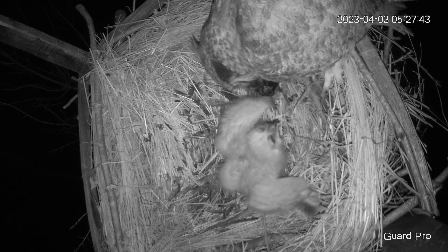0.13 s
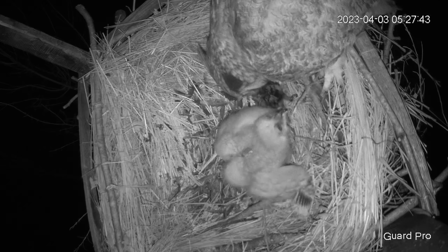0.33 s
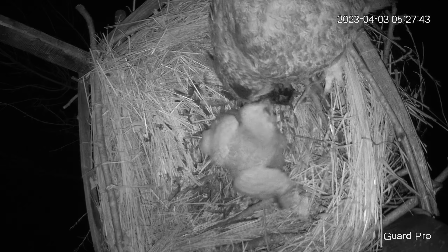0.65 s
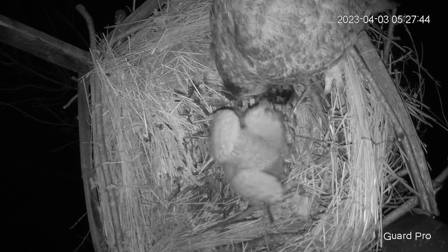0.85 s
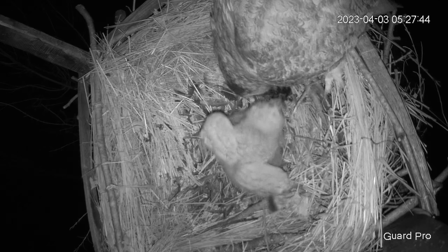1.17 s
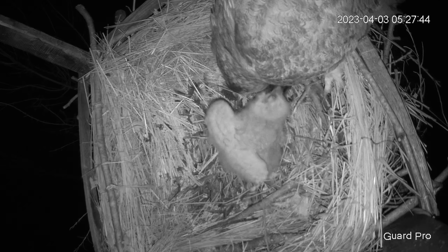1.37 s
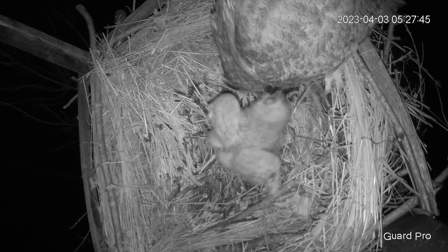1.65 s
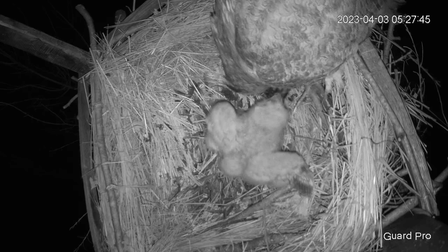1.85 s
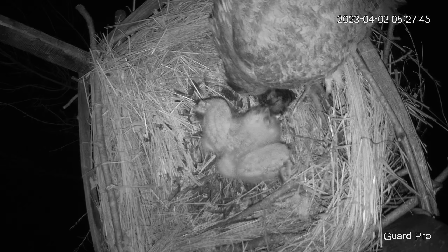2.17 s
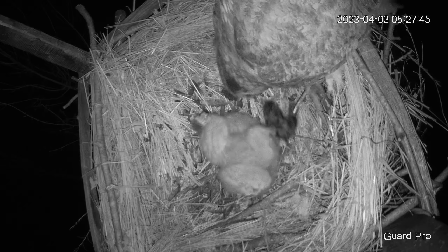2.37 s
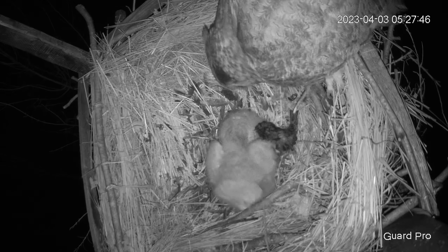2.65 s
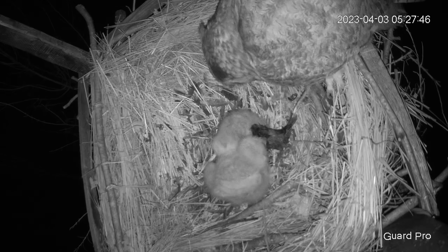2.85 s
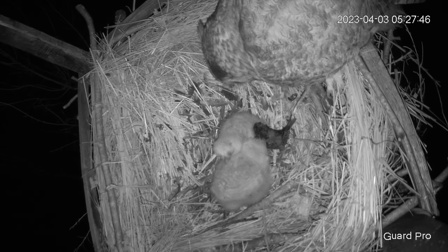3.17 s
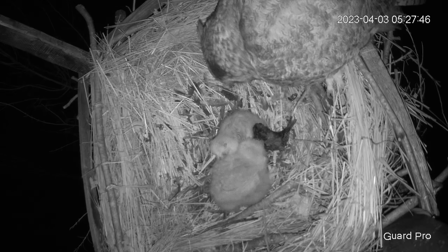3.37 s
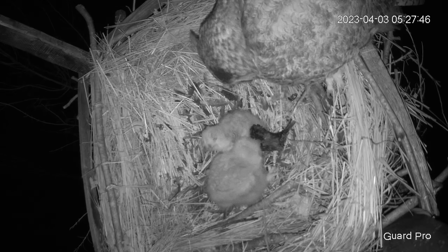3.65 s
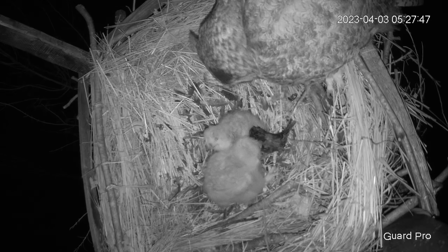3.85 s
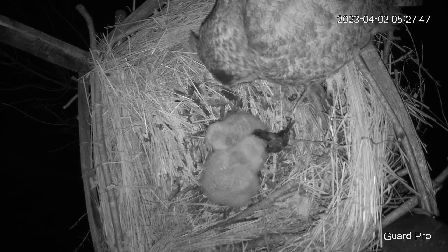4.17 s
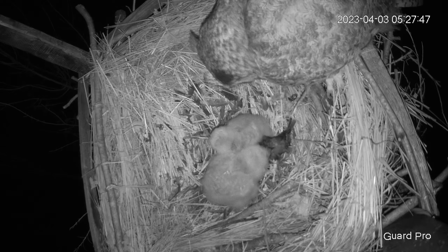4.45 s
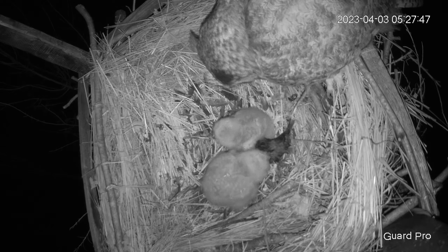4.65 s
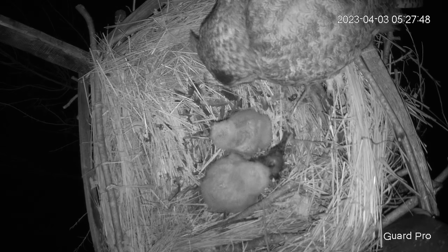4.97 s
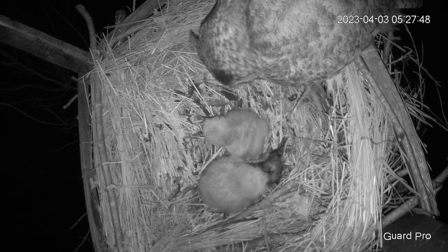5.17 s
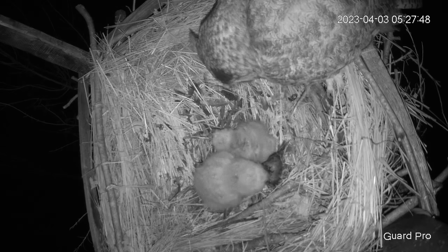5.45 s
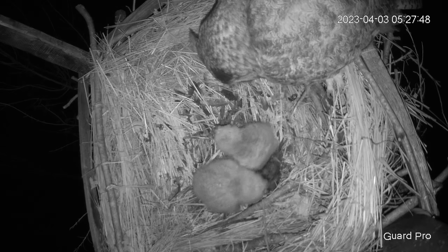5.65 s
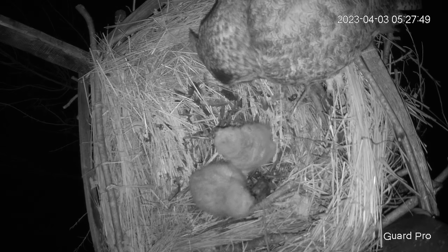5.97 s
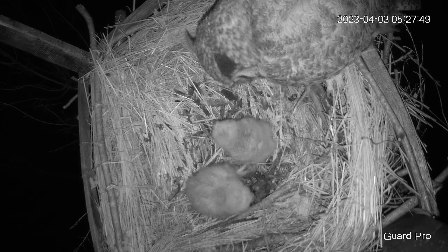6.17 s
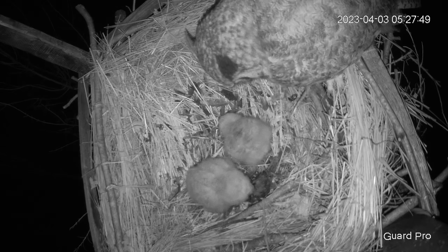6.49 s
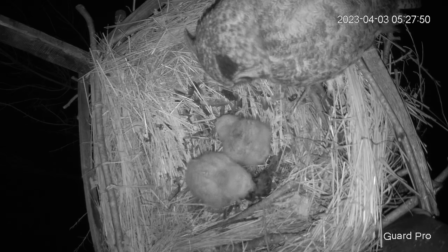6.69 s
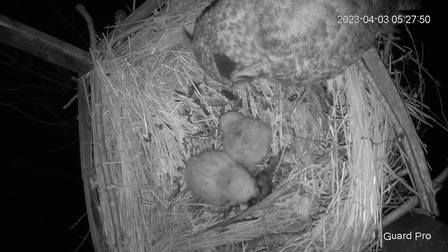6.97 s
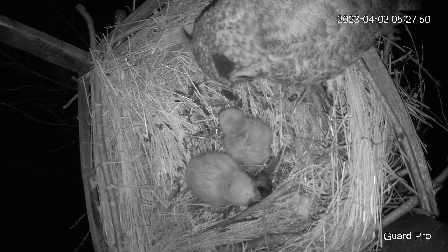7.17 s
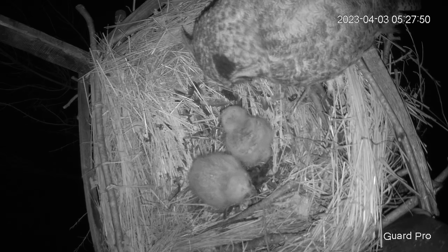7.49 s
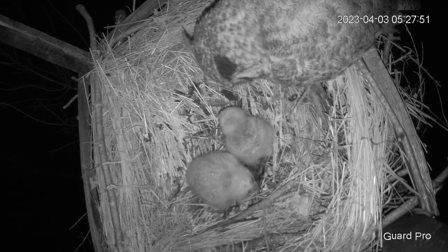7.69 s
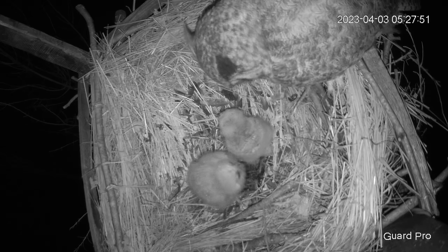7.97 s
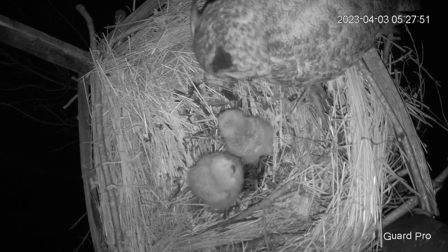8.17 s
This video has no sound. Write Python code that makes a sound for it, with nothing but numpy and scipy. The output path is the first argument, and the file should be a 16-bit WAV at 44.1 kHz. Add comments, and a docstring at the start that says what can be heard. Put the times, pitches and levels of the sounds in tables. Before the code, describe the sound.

Young owls give three raspy, whistling begging screeches in a straw-lined nest box, between dry straw crackles, dull low bumps and near silence.

```python
"""Owlets beg in a straw-lined wooden nest box at night, heard close up.
Three screeches, the middle one weaker, scoop up as a whistle, break into a two-voiced rasp and slide down;
low hoarse undertones are resonant noise around a wavering tone, and a fluttering hiss leads into the last.
Coloured noise and crackles make the straw, low sine swings the bumps, ringing noise the scrapes on the wood.
Behind them lies a dull noise wash with a faint hum and hollow tones from narrow resonances."""
import sys
import numpy as np
from scipy import signal
from scipy.fft import rfft, irfft, next_fast_len
from scipy.io import wavfile
from scipy.ndimage import uniform_filter1d

SR = 44100
rng = np.random.default_rng(int(sys.argv[2]) if len(sys.argv) > 2 else 0)


def transcribe(signal):
    """Save signal, clipped to [-1, 1], as a 16-bit WAV file at the path in sys.argv[1]."""
    frames = np.atleast_2d(signal).T
    limited = np.clip(frames, -1, 1)
    pcm = np.round(limited * 32767).astype(np.int16)
    wavfile.write(sys.argv[1], SR, pcm)


N = 367348
TIME = np.arange(N) / SR

# Spectrum of the steady background wash: frequency_hz, relative_density_db
NIGHT_SPECTRUM = [(20, -4), (35, -3.5), (80, -12), (160, -19), (300, -26.5), (600, -28), (800, -33.5),
                  (1300, -45), (1700, -49), (3000, -46.5), (4200, -53), (7200, -52.5)]
# Resonances of the air in the box: frequency_hz, width_hz, relative_level_db
BOX_AIR = [(254, 77.5, -6), (344.9, 78, -6), (571, 150, -2)]
# Faint hollow tones in the background: middle_s, level_db, length_s, pitch_hz
HOLLOW_TONES = [(0.424, -58.5, 0.25, 570), (0.571, -64, 0.13, 560), (1.061, -59, 0.13, 604),
                (2.062, -66, 0.17, 330), (2.76, -67.5, .12, 556.7), (3.328, -66, 0.21, 559),
                (5.72, -68.5, 0.21, 478.3), (7.801, -64, .35, 470)]
# Low rumbles: a short low burst right at the start, then weight shifts on the floor: middle_s, level_db (before
# the trim), length_s
WEIGHT_SHIFTS = [(.005, -33, 0.086), (0.282, -44.5, 0.24), (0.452, -47, 0.69), (1.19, -52, .2),
                 (1.34, -53, .16), (1.6, -51.5, .14), (1.83, -50.5, 0.27), (2.221, -42, 0.17),
                 (2.526, -42, .26), (3.46, -50, 0.32), (4.781, -40.5, 0.24), (5.14, -43, 0.19),
                 (5.62, -44, 0.18), (5.83, -39, .14), (5.91, -41.5, 0.2), (6.03, -39.5, 0.12),
                 (6.251, -46.5, .16), (6.37, -42, 0.14), (6.5, -44.5, .28), (6.72, -39.5, 0.3),
                 (7.22, -51, .15), (7.702, -43, 0.36), (7.831, -53, 0.13)]
# Spectrum of the floor rumble: frequency_hz, relative_density_db
FLOORBOARD = [(12, 0), (25, 7), (40, -4.5), (80, -10), (125, -15.5), (200, -28), (400, -41), (900, -66)]
# Bumps against the box: start_s, peak_db (before the trim), pitch_hz, decay_s (to -60 dB)
BUMPS = [(0.314, -26, 38.4, 0.33), (0.346, -28, 53, 0.1), (2.294, -26.5, 16, 0.38),
         (2.384, -22.5, 29.5, 0.19), (2.425, -23, 76, 0.062), (2.754, -41.5, 34.2, 0.51),
         (3.163, -37, 42.6, 0.19), (4.627, -23, 42.2, 0.149), (4.934, -31, 25.2, 0.27),
         (6.4, -21.5, 34, 0.088), (6.608, -18.5, 28.7, 0.12), (6.661, -24, 38, 0.044),
         (6.772, -30.5, 49, 0.064), (6.836, -33.5, 65.3, 0.11)]
# Feet scuffing the wood: start_s, level_db (before the fades and the wood)
SCUFFS = [(0.335, -53), (0.554, -48.5), (1.635, -60.5), (2.311, -39.5), (2.418, -57), (2.6, -53.5),
          (4.325, -64), (4.63, -57), (6.397, -60), (6.61, -57.5), (8.26, -56)]
# Resonances of the scuffed wood: frequency_hz, width_hz, relative_level_db
WOOD = [(149, 210, -1), (286.4, 88.4, 8), (434, 100, -3.5), (600, 1600, -11)]
# Shuffles in the straw: middle_s, level_db (before the trim), length_s
SHUFFLES = [(0.068, -65.5, 0.16), (0.233, -57, 0.11), (0.291, -52.5, 0.11), (0.415, -59, 0.11),
            (0.602, -74, 0.28), (0.731, -60, 0.052), (0.854, -74.5, 0.15), (.915, -67.5, 0.067),
            (1.77, -65, .38), (2.039, -62.5, .14), (2.104, -70, .1), (2.21, -60, 0.11), (2.3, -58.5, 0.059),
            (2.367, -74.5, 0.081), (2.486, -55, .17), (2.565, -65.5, 0.075), (2.682, -52.5, 0.075),
            (2.718, -55.5, 0.053), (2.86, -78, 0.17), (3.045, -73, .1), (3.145, -71.5, .15),
            (4.156, -56, 0.12), (4.981, -77, 0.49), (5.289, -67.5, 0.085), (5.364, -76, 0.075),
            (5.478, -71, 0.088), (5.578, -62.5, 0.18), (5.76, -73, 0.35), (5.928, -65.5, 0.14),
            (6.204, -72, .08), (6.304, -66, 0.13), (6.57, -82.5, 0.28), (7.347, -78.5, .12)]
# Stalks that snap: start_s, level_db (before the trim and the straw colour)
SNAPS = [(0.041, -46), (0.279, -38.5), (0.31, -38.5), (0.386, -42.5), (0.546, -40), (0.713, -44.5),
         (.903, -47.5), (1.748, -49), (2.073, -42.5), (2.104, -40.5), (2.188, -39), (2.452, -36),
         (2.669, -37), (2.72, -38.5), (3.114, -44.5), (4.163, -40.5), (4.644, -51), (5.198, -48.5),
         (5.539, -43), (5.584, -42), (6.193, -51), (6.797, -50.5)]
# Spectrum of the straw: frequency_hz, relative_density_db
STRAW_SPECTRUM = [(530, -45), (900, -10.5), (1090, -16.5), (1220, -11.5), (1530, -22), (1890, -5.5),
                  (2510, -8.5), (2670, -3.5), (2910, 3), (3680, -6), (4310, -21.5), (4950, -18),
                  (5550, -11.5), (6320, -19.5), (7000, -10), (9360, -32.5), (15800, -120)]
# The fainter hissing call: start_s, length_s, level_db (before the fades)
HISS_CALL = (7.606, .27, -36.5)
# Throat of the hiss: frequency_hz, width_hz, open_beak_db, shut_beak_loss_db
HISS_THROAT = [(1309, 400, -10.5, 18), (1740, 340, -17.5, 19.5), (2663, 660, -1, 14), (3050, 570, 2.5, 10),
               (3690, 280, 1, 1.5), (4060, 280, -8, 5), (4750, 410, -23, 6), (5370, 490, -32.5, 17.5)]
# Low second voice under each screech:
# start_s, length_s, level_db (at mid-length, before the partials' gains), growth_db_per_s, pitch_hz, glide_hz_per_s
UNDERTONES = [(1.301, .36, -42.5, 10, 1232, 170.5), (4.241, .315, -39, 19.5, 1043, -110),
              (7.743, .29, -42, -8.5, 1051, 125.5)]
# Hoarse partials of that voice: pitch_multiple, width_hz, relative_level_db
UNDERTONE_PARTIALS = [(1, 179, -1.5), (1.19, 520, -10.5), (1.55, 295, -14.5), (2, 602.5, -2.5),
                      (2.449, 501.5, -2)]
# Screeches: start_s, full_voice_s, climax_s, end_s, effort_db, weaker_at_first_db, weaker_before_climax_db,
# weaker_in_slide_db, pitch_hz, roughness_before_climax (0-1)
SCREECHES = [(1.290, 1.412, 1.579, 1.654, -15, 2.6, 0, 18, 3278, .44),
             (4.225, 4.401, 4.534, 4.572, -25.5, 7.5, -1, 7, 3171, .76),
             (7.723, 7.852, 7.982, 8.027, -14.5, 10, 1.5, 10.5, 3108, .4)]
# Throat and open beak that shape the whistle: frequency_hz, gain_db
THROAT = [(1300, -41), (1900, -8), (2150, -7), (2480, -5), (2750, 0.5), (3750, -1.5), (4050, -20.5),
          (4350, -24.5), (7000, -28.5)]
# Air ringing the throat above the whistle:
# throat_multiple, width_hz, level_db (at a flow of -10 dB), extra_db_per_db of flow
THROAT_AIR = [(1.23, 420, -22, -0.5), (1.488, 486, -33, -0.08), (1.69, 351, -32, 0.65),
              (1.89, 413, -34.5, 1), (2.1, 519.6, -45.5, 1)]
# Colour that the box gives to the calls: frequency_hz, gain_db
BOX_COLOUR = [(700, -3.5), (1000, 0), (1280, 0), (1520, -8), (1800, 4), (2100, 1.5), (2520, .5), (3000, .5),
              (3730, 2), (3980, -2), (4330, -3), (4700, 1.5), (5080, 1), (5400, 3), (5650, -1.5),
              (5900, 0.5), (6300, -2.5), (7000, 3.5)]

# Stages of a screech: seconds after the start, before or after the climax, and before the end
LIP_S, SCOOP_S, BREAK_S, CLEAR_S, GIVE_S, STOP_S = .014, .019, .046, .035, .015, .012
# Effort at each stage, in dB over the level of that part of the call
START_DB, LIP_DB, SCOOP_DB, CLIMAX_DB, GIVE_DB, STOP_DB = -21, -5.5, 3.5, 3.5, -9.5, -18
# Roughness, 0-1
WHISTLE_ROUGH, BREAK_ROUGH, FULL_ROUGH, CLIMAX_ROUGH, GIVE_ROUGH, SLIDE_ROUGH = .06, .93, .88, .16, .39, .05
# Pitch as a share of the full pitch; every slide ends at the same low pitch
START_PITCH, SCOOP_PITCH, CLEAR_PITCH, CLIMAX_PITCH, GIVE_PITCH = .78, .865, .97, .918, .83
SLIDE_HZ, STOP_HZ = 2199, 2110


def gain_of(db):
    """Turns decibels into a factor."""
    return 10 ** (np.asarray(db) / 20)


def evened(x):
    """Scales to rms 1."""
    return x / np.sqrt(np.mean(x ** 2) + 1e-20)


def add(mix, start_s, sound):
    """Mixes a sound in at its start time."""
    part = mix[max(round(start_s * SR), 0):][:len(sound)]
    part += sound[:len(part)]


def noise_for(like):
    """White noise as long as a stretch of up to one second."""
    return rng.standard_normal(SR)[:len(like)]


def wander(rate_hz, size=SR):
    """Smooth random motion of rms 1, low-passed at the given rate."""
    lowpass = signal.butter(2, rate_hz, fs=SR, output="sos")
    return evened(signal.sosfilt(lowpass, rng.standard_normal(size)))


def curves(rows):
    """Start time, and each column of a timed table drawn as straight lines between its rows."""
    times, *columns = np.transpose(rows)
    t = TIME[(TIME >= times[0]) & (TIME <= times[-1])]
    return t[0], [np.interp(t, times, column) for column in columns]


def filtered(x, points):
    """Filters by a curve of frequency_hz, gain_db points on a log frequency scale."""
    hz, db = np.transpose(points)
    size = 2 * next_fast_len(len(x) // 2 + 1024)
    bins_hz = np.fft.rfftfreq(size, 1 / SR)
    gain = gain_of(np.interp(np.log(bins_hz + 1), np.log(hz + 1), db))
    return irfft(rfft(x, size) * gain, size)[:len(x)]


def coloured(x, points):
    """Gives x a spectrum and keeps its power."""
    return evened(filtered(x, points)) * np.std(x)


def resonate(x, hz, width_hz, order=4):
    """Steep-sided resonance along the curve hz: shift it to 0 Hz, low-pass in equal stages, shift back."""
    turn = np.exp(2j * np.pi * np.cumsum(hz * np.ones(len(x))) / SR)
    r = np.exp(-np.pi * width_hz / SR)  # the width is that of each stage
    stages = [[1 - r, 0, 0, 1, -r, 0]] * order
    return 2 * (turn * signal.sosfilt(stages, x / turn + 1e-18)).real


def swell(middle_s, level_db, length_s, edge_db=20, roundness=1.25):
    """Start time and envelope of a movement; half a length from its middle it is edge_db weaker."""
    t = TIME[max(round((middle_s - length_s) * SR), 0):round((middle_s + length_s) * SR)]
    distance = abs(t - middle_s) / (length_s / 2)
    return t[0], gain_of(level_db - edge_db * distance ** roundness)


def movements(rows):
    """The summed envelope of a table of swells."""
    out = np.zeros(N)
    for row in rows:
        add(out, *swell(*row))
    return out


def hollow_tones(width_hz=70):
    """Noise through narrow resonances gives soft tones that come and go."""
    out = np.zeros(N)
    for middle_s, level_db, length_s, pitch_hz in HOLLOW_TONES:
        start_s, envelope = swell(middle_s, level_db, length_s)
        tone = evened(resonate(noise_for(envelope), pitch_hz, width_hz))
        add(out, start_s, envelope * tone)
    return out


def night(wash_db=-60, hum_db=-74, waver_db=3, waver_hz=6.67):
    """A dull steady wash, the air in the box humming in wavering resonances, and the hollow tones."""
    wash = gain_of(wash_db) * coloured(rng.standard_normal(N), NIGHT_SPECTRUM)
    air = rng.standard_normal(N)
    level = gain_of(hum_db + waver_db * wander(waver_hz, size=N))
    hum = level * sum(gain_of(db) * evened(resonate(air, hz, width)) for hz, width, db in BOX_AIR)
    return wash + hum + hollow_tones()


def box(shift_trim_db=-1, bump_trim_db=-.5, attack_s=.005):
    """The box rumbles as weight shifts and gives a short low swing at each bump."""
    load = movements(WEIGHT_SHIFTS)
    out = gain_of(shift_trim_db) * load * coloured(rng.standard_normal(N), FLOORBOARD)
    t = TIME[:SR // 2]
    for start_s, peak_db, pitch_hz, decay_s in BUMPS:
        envelope = (1 - np.exp(-t / attack_s)) * gain_of(-60 * t / decay_s)
        swing = np.sin(2 * np.pi * pitch_hz * t) * envelope
        add(out, start_s, gain_of(peak_db + bump_trim_db) * swing / abs(swing).max())
    return out


def scuffs(decay_s=.22, attack_s=.0055):
    """Short scrapes of noise ring the wooden floor's resonances."""
    drive, t = np.zeros(N), TIME[:SR // 3]
    for start_s, level_db in SCUFFS:
        add(drive, start_s, gain_of(level_db - 60 * t / decay_s) * (1 - np.exp(-t / attack_s)))
    grit = rng.standard_normal(N)
    ringing = sum(gain_of(db) * evened(resonate(grit, hz, width)) for hz, width, db in WOOD)
    return drive * evened(ringing)


def stalks(x, depth_db=4.5):
    """Each stalk has its own colour: patches of the spectrum come and go."""
    spectrum = signal.stft(x, nperseg=256)[2]
    across_pitch = uniform_filter1d(rng.standard_normal(spectrum.shape), size=3, axis=0)
    patches = evened(uniform_filter1d(across_pitch, size=11, axis=1))
    return signal.istft(spectrum * evened(gain_of(depth_db * patches)), nperseg=256)[1][:N]


def straw(cracks_per_s=420, spread_db=4, rub=.6, shuffle_trim_db=.22,
          snap_trim_db=-11.52, snap_decay_s=.022, settle_db=-9, settle_decay_s=.13):
    """Stalks rub and crackle under the birds; some snap, and their neighbours settle in a longer tail."""
    pressure = gain_of(shuffle_trim_db) * movements(SHUFFLES)
    size = gain_of(spread_db * np.minimum(rng.exponential(1, N), 4)) * rng.choice([-1, 1], N)
    cracks = evened(size * (rng.random(N) < cracks_per_s / SR))
    drive = pressure * evened(cracks + rub * rng.standard_normal(N))
    t = TIME[:SR // 5]
    dying = gain_of(-60 * t / snap_decay_s) + gain_of(settle_db - 60 * t / settle_decay_s)
    for start_s, level_db in SNAPS:
        add(drive, start_s, gain_of(level_db + snap_trim_db) * dying * rng.standard_normal(len(t)))
    return stalks(coloured(drive, STRAW_SPECTRUM))


def hiss_call(start_s, length_s, level_db, flutter=.41, flutter_hz=150,
              opening_s=.048, attack_s=.018, release_s=.06):
    """Fluttering air with no whistle; it broadens and grows as the beak opens."""
    t = TIME[:round(length_s * SR)]
    air = noise_for(t) * (1.5 + flutter * wander(flutter_hz)[:len(t)])
    shut = np.clip(1.5 - t / opening_s, 0, 1)  # shut for half an opening time, then opens
    voice = sum(gain_of(db - loss_db * shut) * resonate(air, hz, width)
                for hz, width, db, loss_db in HISS_THROAT)
    fades = np.minimum(t / attack_s, 1) ** 2 * np.minimum(t[::-1] / release_s, 1)
    return start_s, gain_of(level_db) * fades * evened(voice)


def membrane(hz, rough, jitter_hz=215, shimmer=.49):
    """One side of the syrinx: a complex tone that wavers in pitch and strength as roughness grows."""
    jitter, shake = wander(210)[:len(hz)], wander(330)[:len(hz)]
    wavering_hz = hz + jitter_hz * np.sqrt(rough) * np.tanh(jitter)
    phase = 2 * np.pi * (np.cumsum(wavering_hz) / SR + rng.random())
    return evened(1 + shimmer * np.sqrt(rough) * shake) * np.exp(1j * phase)


def undertone(start_s, length_s, level_db, growth_db_per_s, pitch_hz, glide_hz_per_s,
              ends_db=-8.5, arch=.04, sag=.15, sag_s=.17, clear_db=-4, hoarse_db=-2, rough=.15):
    """A hoarse voice near 1 kHz: a wavering core with smeared partials, arched in pitch and level."""
    t = TIME[:round(length_s * SR)]
    air = noise_for(t)
    from_middle_s = t - length_s / 2
    off_middle = (2 * t / length_s - 1) ** 2
    hz = pitch_hz * (1 - arch * off_middle) + glide_hz_per_s * from_middle_s
    hz = hz * (1 - sag * gain_of(-60 * t[::-1] / sag_s))  # the pitch drops as the call runs out
    hoarse = sum(gain_of(db + hoarse_db) * evened(resonate(air, multiple * hz, width))
                 for multiple, width, db in UNDERTONE_PARTIALS)
    core = gain_of(clear_db) * evened(membrane(hz, rough).real)
    level = gain_of(level_db + ends_db * off_middle + growth_db_per_s * from_middle_s)
    return start_s, level * (hoarse + core) * signal.windows.tukey(len(t), .12)


def course(start, full, climax, end, level_db, weak_db, sag_db, slide_db, pitch_hz, late_rough):
    """Start time, then effort, pitch and roughness: scoop, break into rasp, clear, give way, slide."""
    early_db = level_db - weak_db
    ending_db = level_db - slide_db
    return curves([  # time_s, effort_db, pitch_hz, roughness
        (start, early_db + START_DB, START_PITCH * pitch_hz, WHISTLE_ROUGH),
        (start + LIP_S, early_db + LIP_DB, START_PITCH * pitch_hz, WHISTLE_ROUGH),
        (start + SCOOP_S, early_db + SCOOP_DB, SCOOP_PITCH * pitch_hz, WHISTLE_ROUGH),
        (start + BREAK_S, early_db, pitch_hz, BREAK_ROUGH),
        (full, level_db, pitch_hz, FULL_ROUGH),
        (climax - CLEAR_S, level_db - sag_db, CLEAR_PITCH * pitch_hz, late_rough),
        (climax, level_db + CLIMAX_DB, CLIMAX_PITCH * pitch_hz, CLIMAX_ROUGH),
        (climax + GIVE_S, level_db + GIVE_DB, GIVE_PITCH * pitch_hz, GIVE_ROUGH),
        (end - STOP_S, ending_db, SLIDE_HZ, SLIDE_ROUGH),
        (end, ending_db + STOP_DB, STOP_HZ, SLIDE_ROUGH)])


def screech(row, lower_split_hz=182.32, upper_split_hz=254.4, rasp_hz=270, rasp_depth=.48,
            octave_db=-22, throat_follow=.62, air_fall_db_per_s=210):
    """The two sides of the syrinx whistle near 3 kHz; forced hard, they pull apart and rasp."""
    start_s, (effort_db, hz, rough) = course(*row)
    rough, effort = np.clip(rough, 0, 1), gain_of(effort_db)

    drift, stutter = wander(77.1)[:len(hz)], wander(140)[:len(hz)]
    rasp_phase = 2 * np.pi * np.cumsum(rasp_hz * (1 + .3 * drift)) / SR
    beat = 1 + rasp_depth * np.sqrt(rough) * np.sin(rasp_phase)
    beat = evened(beat * (1 + .2 * np.tanh(stutter)))

    lower = membrane(hz - lower_split_hz * rough, rough)
    upper = membrane(hz + upper_split_hz * rough, rough)
    steady_power = np.sqrt(2 / (1 + rough ** 2))  # offsets the power that the upper side adds
    tone = (lower + rough * upper) * beat * steady_power
    whistle = filtered(effort * tone.real, THROAT)
    octave = gain_of(octave_db) * effort ** 2 * (lower ** 2).real  # gains 2 dB per dB of effort

    middle_hz = np.median(hz)
    throat_hz = middle_hz * (hz / middle_hz) ** throat_follow  # the throat relaxes as the pitch falls
    throat_hz = throat_hz * (1 + .03 * rough * wander(45)[:len(hz)])
    fall_db = air_fall_db_per_s * TIME[:len(hz)]
    # the airflow rises with the effort but can only die away at the set rate
    flow_db = np.maximum.accumulate(effort_db + fall_db) - fall_db
    puffs = noise_for(hz) * beat
    air = sum(gain_of(db + growth * (flow_db + 10)) * evened(resonate(puffs, multiple * throat_hz, width))
              for multiple, width, db, growth in THROAT_AIR)
    breath = gain_of(flow_db) * (.25 + .62 * rough) * air
    return start_s, (whistle + octave + breath) * signal.windows.tukey(len(hz), .07)


def surroundings(x, walls_db=-7.5, walls_decay_s=.02, far_db=-38.5, far_decay_s=.36,
                 far_hz=2800, far_width_hz=1700, reflections_per_s=3000):
    """Sparse decaying noise: quick reflections from the box walls and a faint, narrow outdoor echo."""
    t = TIME[:SR]
    near, far = rng.standard_normal((2, SR)) * (rng.random((2, SR)) < reflections_per_s / SR)
    near *= gain_of(-60 * t / walls_decay_s) * (t > .001)
    far *= gain_of(-60 * t / far_decay_s) * (t > .02)
    far = resonate(far / np.linalg.norm(far), far_hz, far_width_hz)
    echo = gain_of(walls_db) * near / np.linalg.norm(near) + gain_of(far_db) * far
    return x + signal.fftconvolve(x, echo)[:N]


def scene():
    """Calls and straw with their reflections, over the box, the scuffs and the night air, in mono."""
    calls = np.zeros(N)
    for row in SCREECHES:
        add(calls, *screech(row))
    for row in UNDERTONES:
        add(calls, *undertone(*row))
    add(calls, *hiss_call(*HISS_CALL))
    reflected = surroundings(filtered(calls, BOX_COLOUR) + straw())
    return (reflected + box() + scuffs() + night())[None]


def record(dry, ceiling_db=-6, edge_hz=7300):
    """A fast limiter rounds off the loudest peaks; then a steep low-pass removes the top treble."""
    envelope = uniform_filter1d(abs(signal.hilbert(dry[0], next_fast_len(N))[:N]), 24)
    limited = dry / (1 + (envelope / gain_of(ceiling_db)) ** 6) ** (1 / 6)
    lowpass = signal.firwin(611, edge_hz, window=("kaiser", 8), fs=SR)
    return signal.oaconvolve(limited, lowpass[None], "same")


dry = scene()
out = record(dry)
transcribe(out)
```